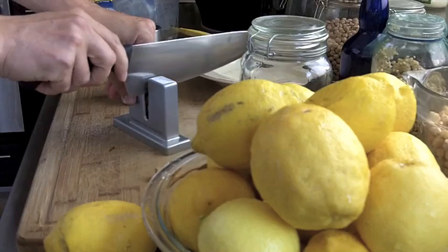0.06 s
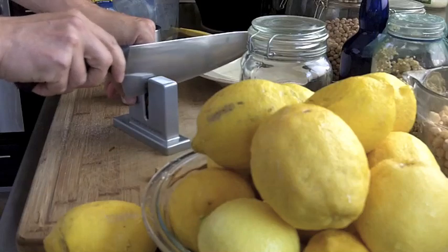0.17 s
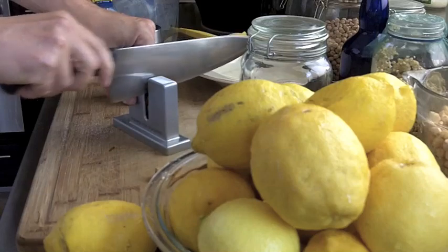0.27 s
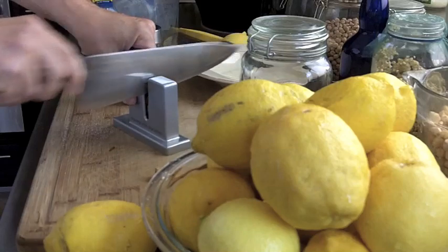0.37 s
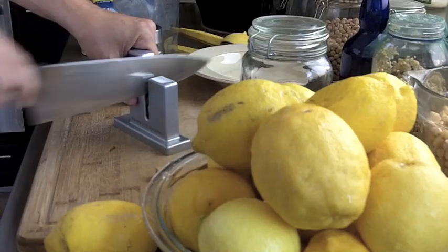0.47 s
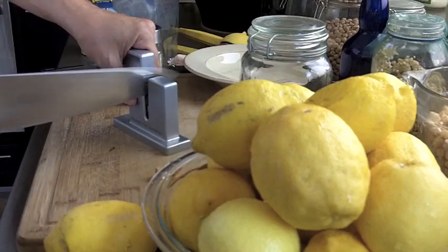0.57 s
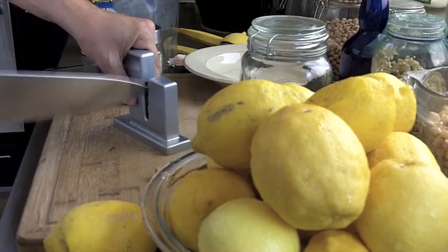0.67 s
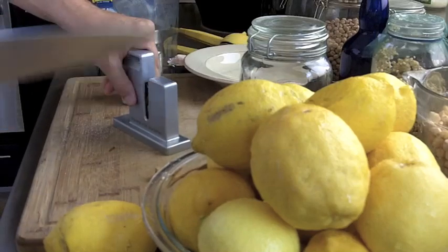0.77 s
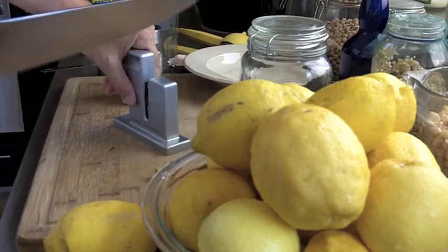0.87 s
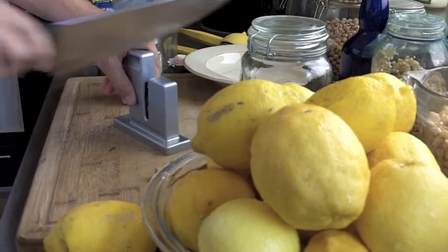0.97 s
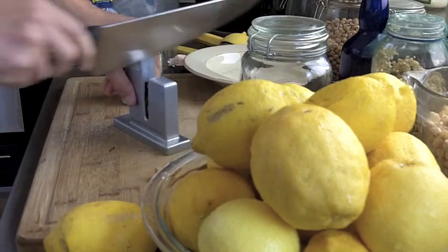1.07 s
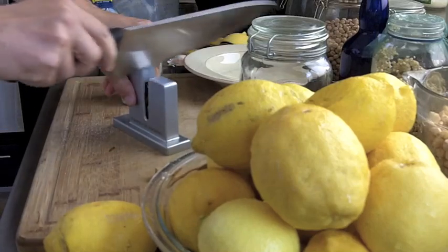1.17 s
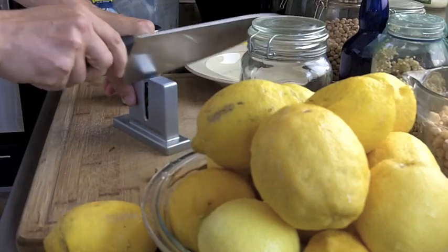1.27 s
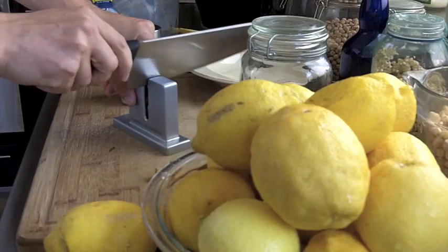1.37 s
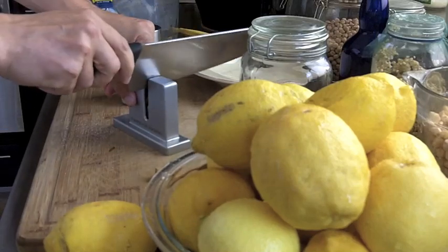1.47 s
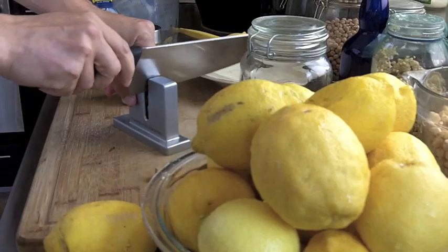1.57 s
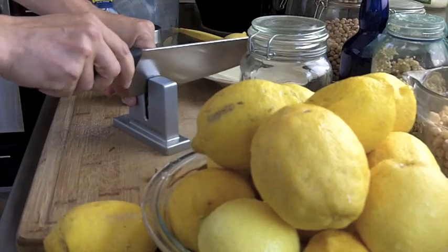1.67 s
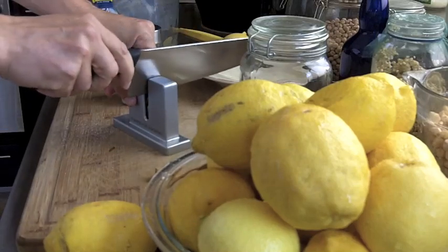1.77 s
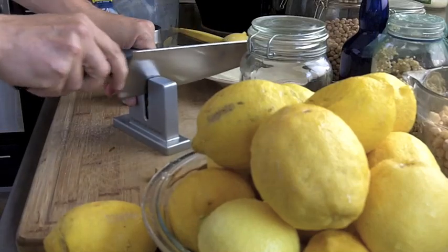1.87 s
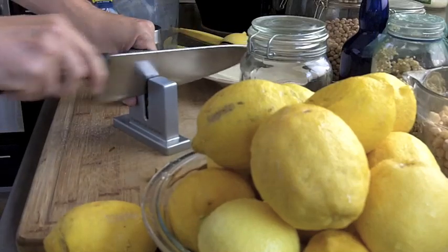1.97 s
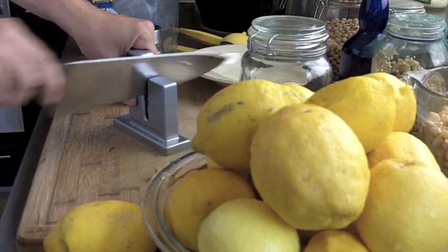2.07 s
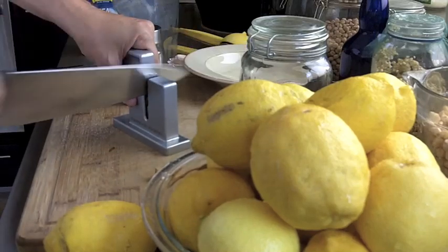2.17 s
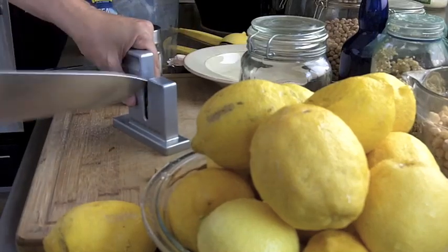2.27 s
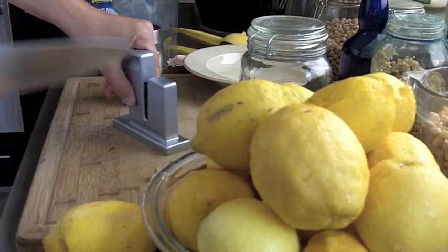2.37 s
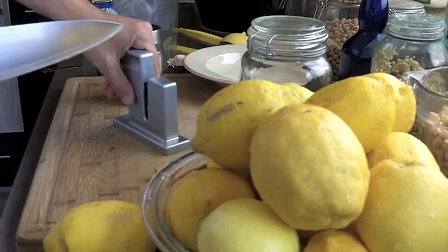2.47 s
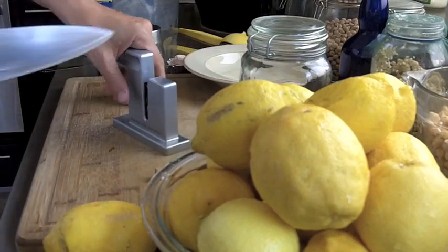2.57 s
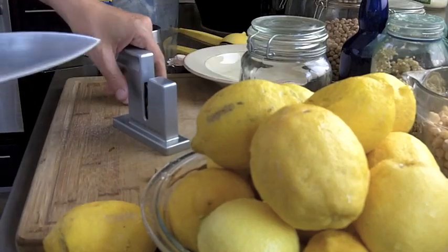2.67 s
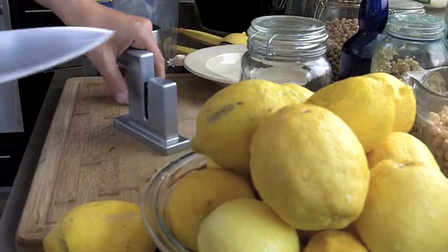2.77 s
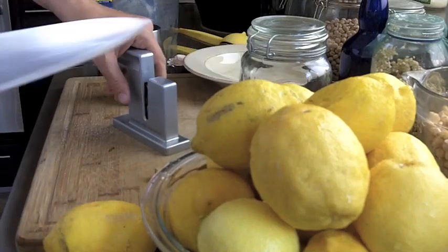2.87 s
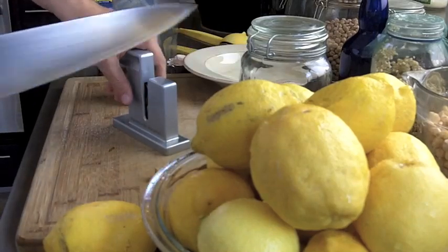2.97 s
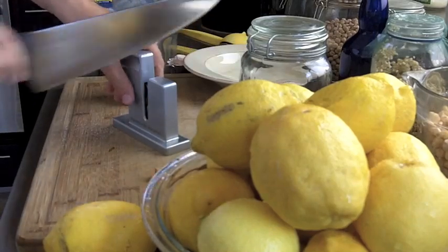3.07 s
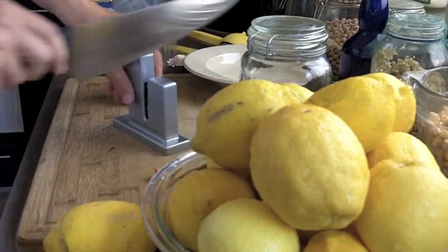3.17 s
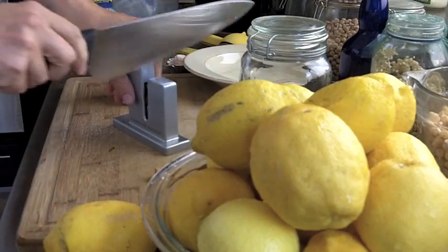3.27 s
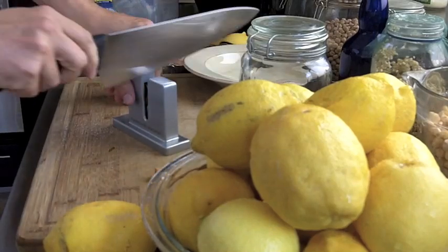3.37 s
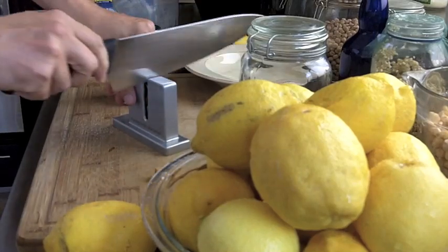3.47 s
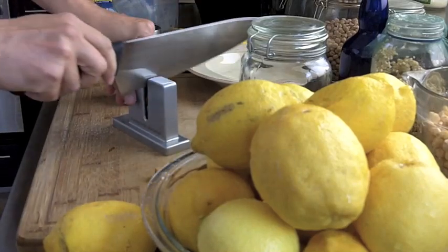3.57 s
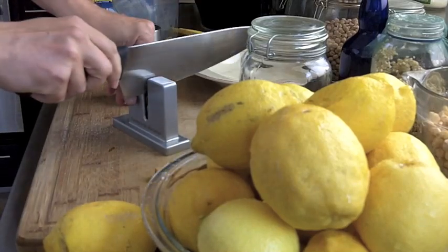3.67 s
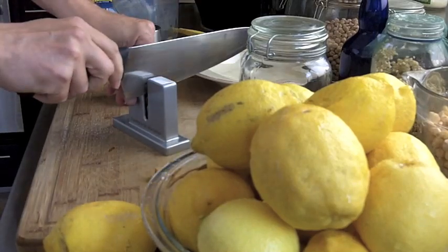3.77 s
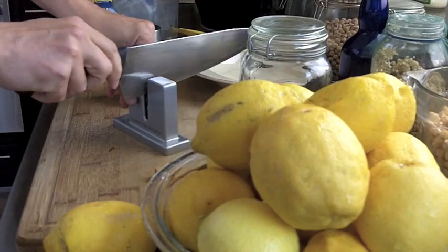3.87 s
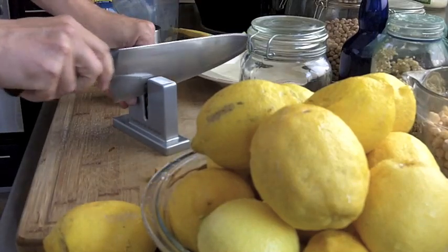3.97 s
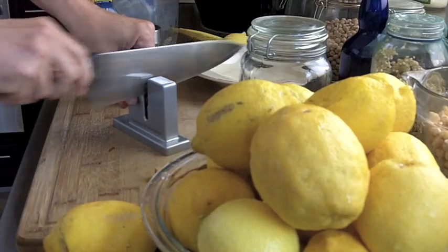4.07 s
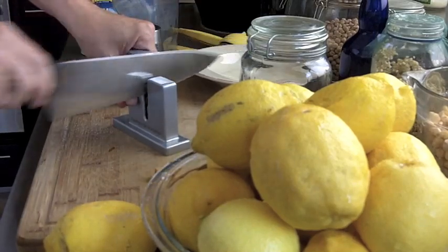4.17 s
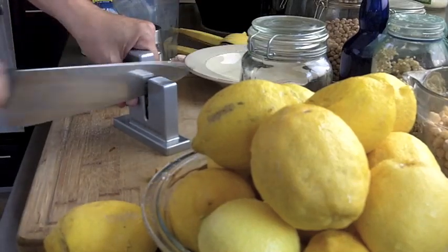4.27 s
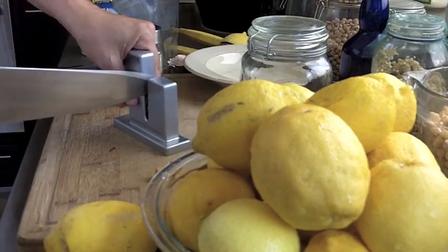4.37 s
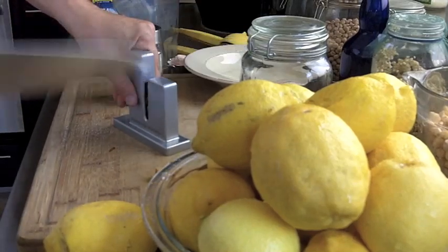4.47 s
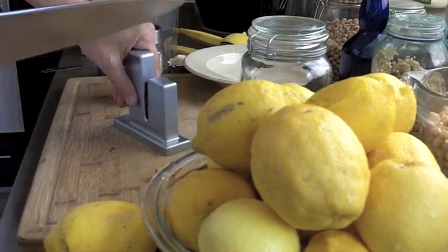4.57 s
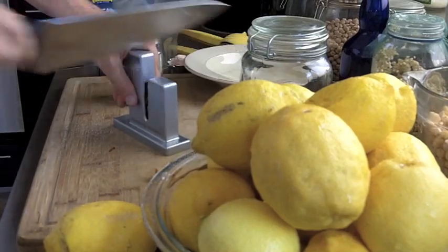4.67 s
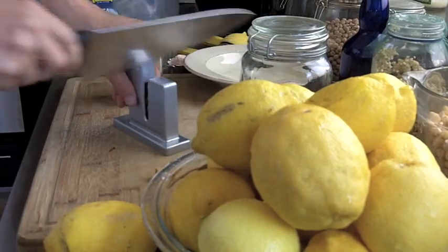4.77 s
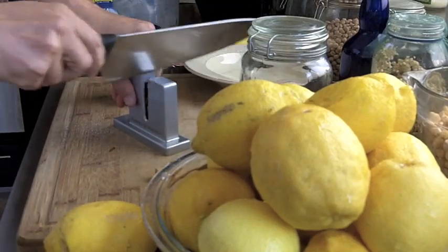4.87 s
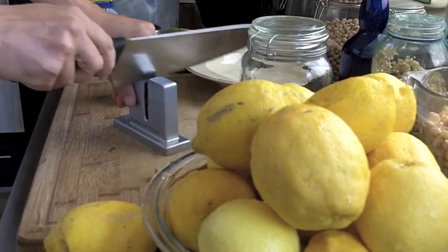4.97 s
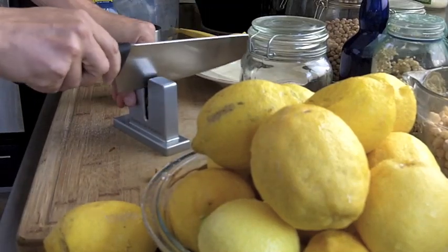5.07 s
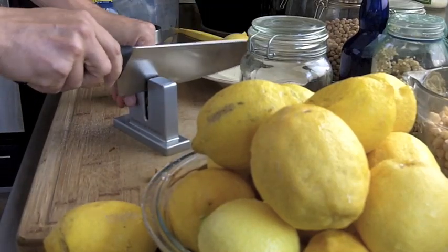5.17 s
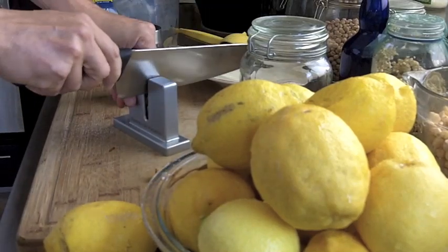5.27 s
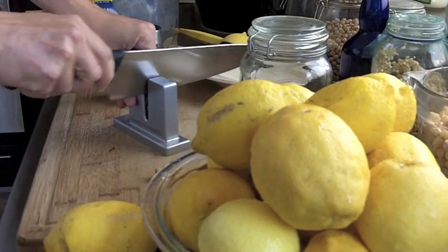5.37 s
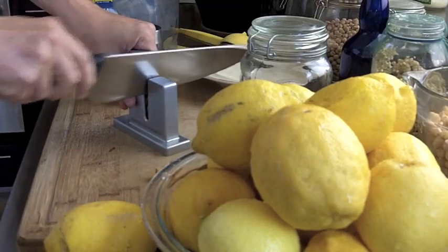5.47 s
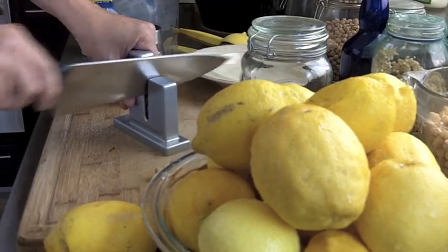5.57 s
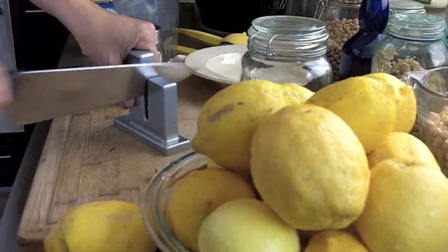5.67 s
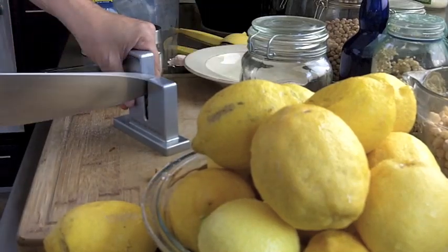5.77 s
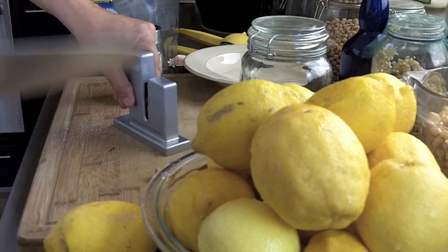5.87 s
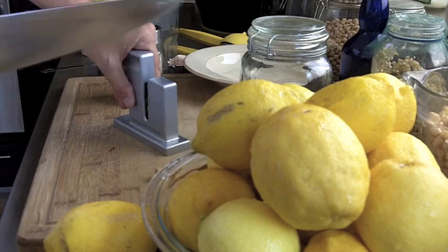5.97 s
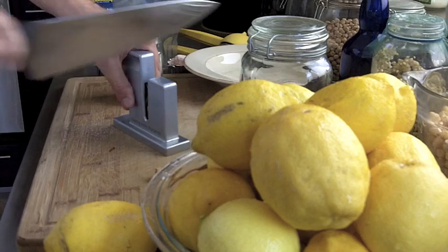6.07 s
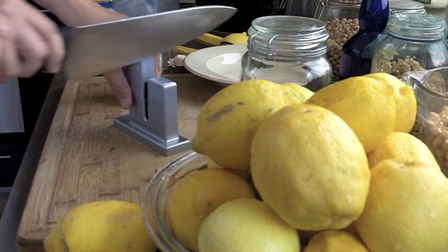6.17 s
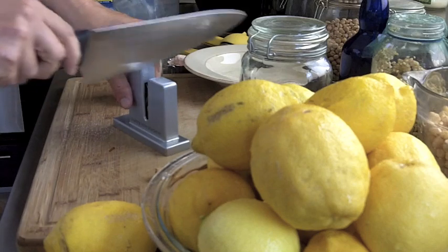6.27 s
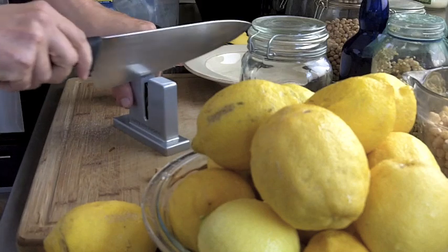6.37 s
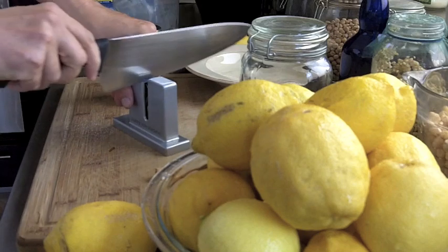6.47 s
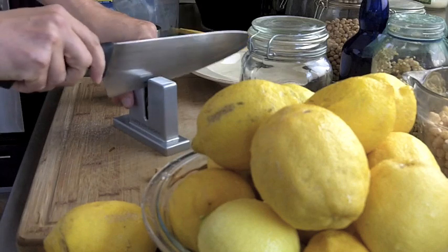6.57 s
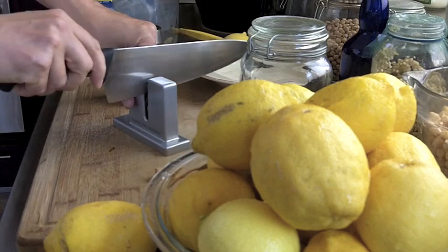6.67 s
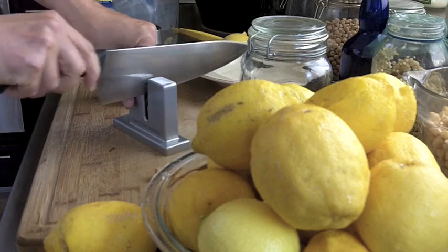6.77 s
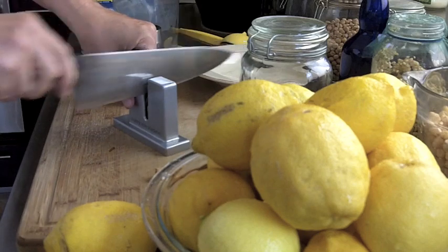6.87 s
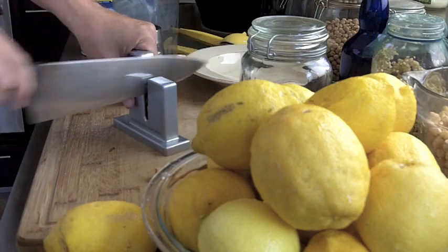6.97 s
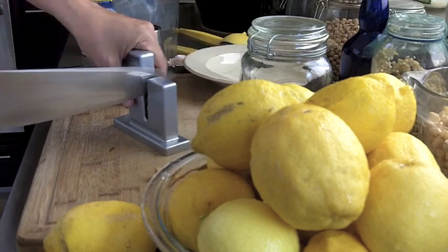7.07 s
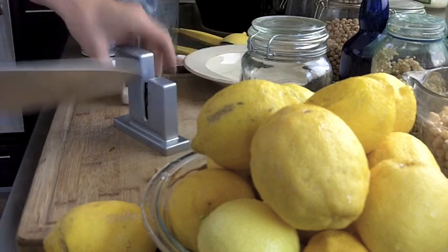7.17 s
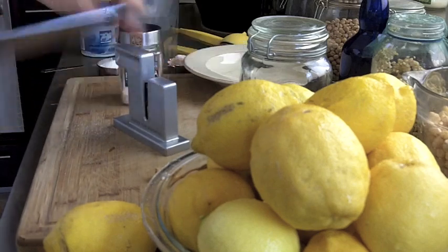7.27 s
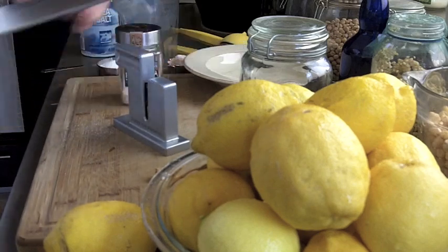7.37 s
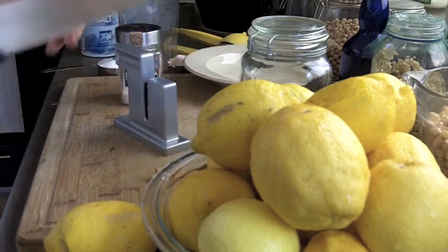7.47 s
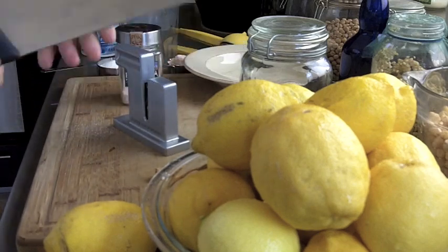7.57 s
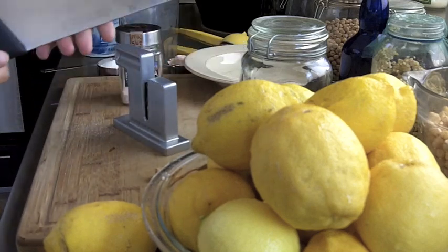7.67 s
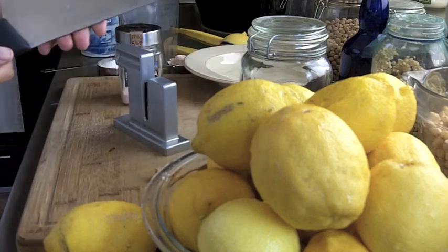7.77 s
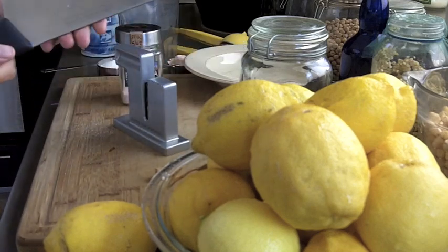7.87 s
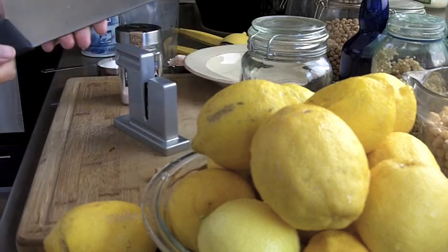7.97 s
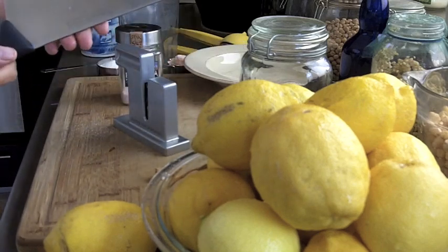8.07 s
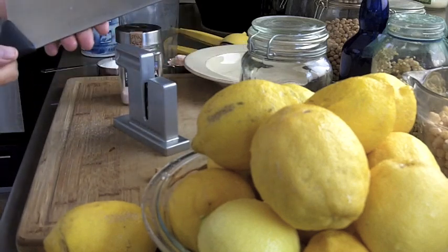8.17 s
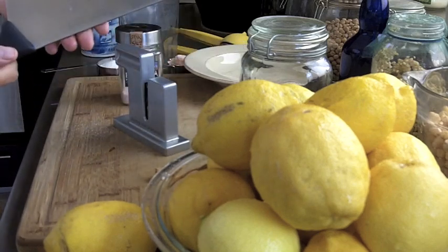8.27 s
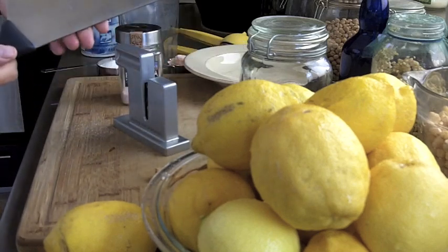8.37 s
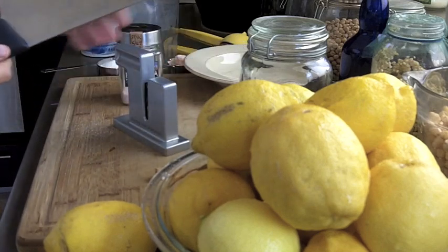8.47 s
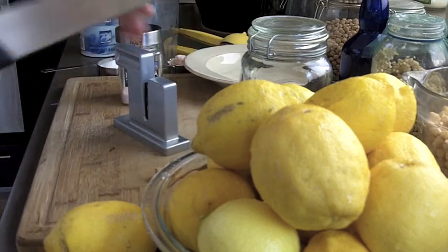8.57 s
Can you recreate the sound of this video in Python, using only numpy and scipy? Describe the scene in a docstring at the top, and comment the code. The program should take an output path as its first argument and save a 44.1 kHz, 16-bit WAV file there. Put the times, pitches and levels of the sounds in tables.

```python
"""In a small kitchen, a steel knife is drawn five times through a hand sharpener on a wooden board, dead centre.
The blade knocks at the slot, catches on rough spots and rasps with growing pressure until the tip squeaks out.
Stick-slip noise drives the resonances of holder and board, giving a hollow voice; the free blade rings faintly.
Early reflections and a diffuse tail place it in the room, over house rumble, hiss and appliance hum.
The microphone has a narrow treble dip and a little hiss of its own in each channel."""
import sys
import numpy as np
from scipy import signal
from scipy.fft import rfft, irfft, next_fast_len
from scipy.io import wavfile

SR = 44100
rng = np.random.default_rng(int(sys.argv[2]) if len(sys.argv) > 2 else 0)


def materialize(psi):
    """Save the field psi as 16-bit PCM at rate SR to the path in sys.argv[1].

    A 1-D psi becomes a single channel; in a 2-D psi each row is a channel.
    """
    bounded = np.clip(np.atleast_2d(psi).T, -1, 1)
    quanta = np.round(bounded * 32767).astype(np.int16)
    wavfile.write(sys.argv[1], SR, quanta)


N = 380141
TIME = np.arange(N) / SR   # s
SIZE = next_fast_len(N + SR)   # transform length, with room for a second of ringing
FREQ = np.maximum(np.arange(SIZE // 2 + 1) * SR / SIZE, 1)   # Hz

# House noise. Each row: frequency in Hz, relative density in dB per Hz.
HOUSE_NOISE = [(10, 7.5), (26, 0.5), (40, -8), (55, -9.5), (80, -15), (150, -19.5), (260, -22.5),
               (420, -19), (650, -18.5), (1000, -22.5), (1500, -27.5), (2500, -35.5), (5000, -44.5),
               (9000, -51.5), (15000, -53.5)]
HOUSE_NOISE_DB = -42.5
# Appliance hum. Each row: frequency in Hz, mean level in dB (rms).
APPLIANCE_HUM = [(59, -54), (102, -66), (163, -67), (637, -66), (997, -66), (4250, -79)]
# Kitchen decay. Each row: frequency in Hz, time to fall by 60 dB in s.
ROOM_DECAY = [(200, 0.89), (900, 0.89), (2000, 0.68), (5000, 0.88), (12000, 0.39)]
# Resonances of holder, board and clamped blade.
# Each row: frequency in Hz, width in Hz, height over the broad response in dB.
HOLDER_MODES = [(98, 20, 8), (320, 40, -2), (430, 30, 2), (490, 14, -2), (728, 14, 2), (846, 30, 3),
                (910, 20, 0), (1146, 20, -1), (1310, 45, -1), (1398, 45, 4), (1447, 18, 3), (1790, 20, 6),
                (2400, 70, -4), (3531, 60, -6), (4540, 90, -3), (6090, 80, -1), (6930, 60, -1),
                (7900, 110, -4), (9520, 130, -3), (10600, 60, 2)]
# Modes of the free blade. Each row: frequency in Hz, relative level in dB, time to fall by 60 dB in s.
FREE_BLADE_MODES = [(1790, 0, .7), (2336, -6, .2), (3531, 0, .6), (6013, 0, .28), (6640, -20, .34),
                    (7827, -16, .3), (9437, -2, .24)]
# The free blade is tapped or let go and sings.
# Each row: start in seconds, level in dB, frequency in Hz that the point of contact favours.
BLADE_PINGS = [(0.74, -42, 1790), (0.828, -41.5, 6013), (1.526, -48, 7000), (1.693, -56, 6013),
               (2.37, -35, 1790), (4.48, -44, 1790), (5.363, -46.5, 6013), (6.57, -28.5, 7200),
               (7.215, -42, 3531), (7.22, -42, 1790), (7.223, -36, 9437), (8.180, -67, 9437),
               (8.503, -54, 6013)]
# The blade knocks against the slot.
# Each row: start in seconds, strength in dB, treble relative to the middle in dB, bass likewise in dB.
SLOT_KNOCKS = [(0.195, -9.5, -3, -4.5), (0.236, -26, -13, 8), (0.308, -12, -24, -2.5),
               (0.397, -10.5, -2, -15), (0.828, -18.5, 14.5, 2.5), (1.528, -14.5, 1.5, 0.5),
               (1.69, -23.5, -18, 7), (1.764, -17.5, -9, -1.5), (1.869, -30, -10, 5),
               (1.956, -20, -15, 1.5), (3.856, -15, 5, 1.5), (4.04, -11.5, -24, -0.5),
               (5.348, -26.5, -10, 1.5), (5.363, -14, 2, 2.5), (5.421, -25.5, 6, 8), (5.525, -23, -5, 4),
               (6.569, -6.5, -16, -4), (6.761, -17.5, 3, 0.5), (6.81, -7.5, 5.5, -7),
               (6.887, 3, -19, -14.5), (8.186, -37, 5, -10), (8.503, -35, 5, -9)]
# Colours of knock, drag and bite. Each row: frequency in Hz, relative density in dB per Hz.
KNOCK_COLOUR = [(100, -19), (300, -3.5), (550, 2.5), (900, 7), (1400, 4.5), (1900, 0), (2600, 1),
                (4200, -6), (6500, -9.5), (9000, -17.5), (12000, -27.5), (15000, -30.5)]
DRAG_COLOUR = [(80, -29.5), (170, -23), (250, -23), (400, -13.5), (620, -6.5), (850, 1.5), (1050, 3.5),
               (1450, -5.5), (1700, -8.5), (2100, -10.5), (3000, -14.5), (5000, -38.5), (14000, -57.5)]
BITE_COLOUR = [(800, -8.5), (1800, 2.5), (2700, -1), (4000, -1.5), (5000, 1), (6500, 0), (8000, -6),
               (10000, -13.5), (12000, -17.5), (15000, -27)]
# Bending modes of the clamped blade. Each row: frequency in Hz, relative level in dB.
BENDING_MODES = [(2480, 1), (3000, -5.5), (3450, -5), (3950, 1.5), (4560, -3.5), (6200, 1.5), (7000, -4),
                 (7850, -13.5), (8800, -6), (9600, -8), (10600, -9.5)]
# Rough spots where the edge digs in. Each row: start in seconds, length in s, bite in dB, drag in dB.
ROUGH_SPOTS = [(0.352, 0.017, -41.5, -27), (0.426, 0.027, -54, -24.5), (0.455, 0.042, -23, -46),
               (0.497, 0.027, -27.5, -40), (0.555, 0.027, -33, -29), (0.696, 0.037, -42, -22.5),
               (1.962, 0.081, -49.5, -30), (2.166, 0.017, -27, -36), (4.099, .04, -46, -28),
               (4.181, 0.0096, -26.5, -34), (4.195, 0.076, -30.5, -35), (4.291, 0.031, -28.5, -25),
               (4.415, 0.034, -45, -23), (5.59, 0.017, -35, -38), (5.822, 0.015, -48, -26),
               (6.935, 0.068, -31.5, -26.5), (7.009, 0.014, -25, -29)]
# The pulls. Each row: start in seconds, time to the tip in s, press-in in s, let-go in s, drag in dB,
# bite in dB, squeak of the tip in dB, top slip rate in Hz, chatter relative to drag in dB.
KNIFE_PULLS = [(0.25, 0.48, 0.19, .07, -27.5, -38, -36, 1351, -4),
               (1.955, 0.4, .19, .025, -25, -37, -30.5, 1800, -1),
               (4.015, .46, 0.18, .04, -25.5, -35.5, -33, 1420, -1),
               (5.495, .388, 0.16, .03, -25.5, -38, -26.5, 1543, 1.5),
               (6.77, 0.44, 0.26, .025, -24, -35, -25.5, 2120, -4.5)]

ENTRY_DB, SWELL_DB = -13.5, 4   # pressure at first touch; its growth from heel to tip
TOUCH_S, BITE_LOW_HZ = 0.029, 490   # settling into the slot; shaving is too fine to shake the holder below this
SPEED_UP_AT, SPEED_UP_OVER = .45, .09   # where and how gradually the hand gathers speed, as shares of the edge
# slip rate and relative bite of a slow edge; chatter lost at full speed
SLOW_SLIP_HZ, SLOW_BITE_DB, CHATTER_FADE_DB = 826.3, -5.5, 7
TIP_S, TIP_DRAG_DB, TIP_BITE_DB = 0.017, -5.5, -3.5   # half-length of the squeak; drag and bite relative to it
NICK_RISE = .2   # share of a rough spot's length in which it builds up
CUTOFF_HZ = 15400   # top of the microphone channel


def from_db(db):
    """Decibels to gain."""
    return 10 ** (np.asarray(db) / 20)


def rms_one(x):
    """Scale to rms 1."""
    return x / np.sqrt(np.mean(x ** 2) + 1e-20)


def at_hz(points, hz):
    """Read a table on a log-frequency axis."""
    points = np.array(points)
    return np.interp(np.log(hz), np.log(points[:, 0]), points[:, 1])


def colour(x, spectrum):
    """Causal (minimum-phase) filter with the given spectrum and unit power gain."""
    gain = rms_one(from_db(at_hz(spectrum, FREQ)))
    cepstrum = irfft(np.log(gain), SIZE)
    # folding the cepstrum onto positive times makes the filter causal
    cepstrum[1:SIZE // 2] *= 2
    cepstrum[SIZE // 2 + 1:] = 0
    return irfft(rfft(x, SIZE) * np.exp(rfft(cepstrum)), SIZE)[:N]


def drift(rate):
    """Smooth random wander of rms 1 that changes about rate times a second."""
    pole = np.exp(-2 * np.pi * rate / SR)
    wander = signal.lfilter([1], [1, -2 * pole, pole * pole], rng.standard_normal(N + SR))
    return rms_one(wander[SR:])   # the first second only settles the filter


def split(x, hz):
    """The parts of x below and above hz, which sum to x."""
    low = signal.sosfilt(signal.butter(1, hz, fs=SR, output="sos"), x)
    return low, x - low


def narrow_noise(hz, width_hz):
    """An unsteady vibration around a frequency that may move."""
    phase = 2 * np.pi * np.cumsum(hz) / SR
    return drift(width_hz) * np.cos(phase) + drift(width_hz) * np.sin(phase)


def ambience(side_db):
    """Rumble and hiss of the house with an appliance hum, almost the same on both sides."""
    mid = colour(rng.standard_normal(N), HOUSE_NOISE)
    side = colour(rng.standard_normal(N), HOUSE_NOISE)
    hum = np.zeros(N)
    for hz, level_db in APPLIANCE_HUM:
        level = from_db(level_db + 0.86 * drift(1.1))
        hum += level * np.sqrt(2) * np.sin(2 * np.pi * hz * TIME + drift(0.94))
    opposed = from_db(side_db) * side * np.array([[1], [-1]])
    return hum + from_db(HOUSE_NOISE_DB) * (mid + opposed)


def kitchen(x, early_db, early_s, tail_db):
    """Quick reflections from the counter and jars, then a diffuse tail that dies by band."""
    age = TIME[:SR]
    early = rng.standard_normal(SR) * np.exp(-age / early_s) * (age > .0015)
    white, tail = rfft(rng.standard_normal(SR)), np.zeros(SR)
    bin_hz = np.arange(len(white)) + 1
    centres = np.geomspace(200, 12800, 7)   # octave bands, Hz
    for hz, share in zip(centres, np.eye(len(centres))):
        band = np.interp(np.log(bin_hz), np.log(centres), share)
        tail += irfft(white * band, SR) * from_db(-60 * age / at_hz(ROOM_DECAY, hz))
    tail *= np.clip(age / 0.005, 0, 1)
    early = from_db(early_db) * early / np.linalg.norm(early)
    tail = from_db(tail_db) * tail / np.linalg.norm(tail)
    return x + signal.fftconvolve(x, early + tail)[:N]


def body(force):
    """Holder, board and blade ring at their resonances on top of the broad response."""
    response = 1
    for hz, width, height_db in HOLDER_MODES:
        response = response + from_db(height_db) / (1 + 1j * (FREQ ** 2 - hz ** 2) / (FREQ * width))
    return irfft(rfft(force, SIZE) * response, SIZE)[:N]


def pings(focus_db):
    """Undamped by the slot, the blade rings in thin modes, weaker by focus_db per octave off the favoured one."""
    out, age = np.zeros(N), TIME[:SR * 3 // 4]
    for start, level_db, favoured_hz in BLADE_PINGS:
        at = round(start * SR)
        for hz, mode_db, t60 in FREE_BLADE_MODES:
            start_db = level_db + mode_db - focus_db * abs(np.log2(hz / favoured_hz))
            ring = from_db(start_db - 60 * age / t60) * np.sin(2 * np.pi * hz * age)
            out[at:at + len(age)] += ring[:N - at]
    return out


def knocks(rattle, rattle_s):
    """Each contact is a hard click followed by a short, decaying rattle in the slot."""
    force, age = np.zeros(N), TIME[:SR // 16]
    for start, strength_db, treble_db, bass_db in SLOT_KNOCKS:
        bounces = rng.standard_normal(len(age)) * np.exp(-age / rattle_s)
        hit = rattle * bounces / np.linalg.norm(bounces)
        hit[0] += 1   # the click
        low, rest = split(hit, 2600)
        middle, high = split(rest, 4800)
        hit = from_db(bass_db) * low + middle + from_db(treble_db) * high
        at = round(start * SR)
        force[at:at + len(age)] += (from_db(strength_db) * hit)[:N - at]
    return colour(force, KNOCK_COLOUR)


def nicks():
    """Extra drag and bite as gains: a rough spot grabs quickly and frees the edge gradually."""
    drag, bite = np.zeros((2, N))
    peak_at = np.clip(NICK_RISE, .01, .9)
    for start, length, bite_db, drag_db in ROUGH_SPOTS:
        grab = np.sqrt(np.interp((TIME - start) / length, [0, peak_at, 1], [0, 1, 0]))
        drag += grab * from_db(drag_db)
        bite += grab * from_db(bite_db)
    return drag, bite


def pull_controls():
    """Each pull presses in, gathers speed and lets go at the tip: four gains, travel 0-1 and slip rate in Hz."""
    drag, bite, sing, chatter, travel, slip_hz = np.zeros((6, N))
    for start, length, press_s, let_go_s, drag_db, bite_db, tip_db, top_hz, chatter_db in KNIFE_PULLS:
        age = TIME - start
        along = np.clip(age / length, 0, 1)   # heel 0, tip 1
        pressed = np.clip(age / press_s, 0, 1)
        settling = np.clip(age / TOUCH_S + .5, 0, 1) ** 2
        letting_go = np.exp(-np.clip((age - length) / let_go_s, 0, 10) ** 2)
        touching = settling * letting_go
        pressure = touching * from_db(ENTRY_DB * (1 - pressed) + SWELL_DB * (along - 1))
        speed = 1 / (1 + np.exp((SPEED_UP_AT - along) / SPEED_UP_OVER))
        tip = from_db(tip_db) * np.exp(-np.minimum(abs(age - length) / TIP_S, 10) ** 2)
        shaving = pressure * from_db(bite_db + SLOW_BITE_DB * (1 - speed))
        drag += pressure * from_db(drag_db) + tip * from_db(TIP_DRAG_DB)
        bite += shaving + tip * from_db(TIP_BITE_DB)
        sing += shaving + tip
        chatter += pressure * pressed * from_db(drag_db + chatter_db - CHATTER_FADE_DB * speed)
        in_slot = touching > 1e-4
        travel += in_slot * along
        slip_hz += in_slot * speed * (top_hz - SLOW_SLIP_HZ)
    return drag, bite, sing, chatter, travel, SLOW_SLIP_HZ + slip_hz


def slips(per_s, spread_db, smooth):
    """Tiny stick-slip releases of uneven size over a smooth rub; rms 1."""
    sizes = from_db(spread_db * np.minimum(rng.exponential(1, N), 4)) * rng.choice([-1, 1], N)
    releases = rms_one(sizes * (rng.random(N) < per_s / SR))
    return rms_one(releases + smooth * rng.standard_normal(N))


def squeal(travel, width_hz, swing, flare_db):
    """Friction feeds the bending modes; each swings in pitch as the clamp passes its nodes, and flares briefly."""
    out = np.zeros(N)
    for hz, level_db in BENDING_MODES:
        nodes = np.sqrt(hz / 1000)   # bending waves shorten with the root of frequency
        bend = swing * (np.sin(2 * np.pi * nodes * travel + drift(0.94)) + .5 * drift(12))
        flare = from_db(level_db + flare_db * np.tanh(drift(23) - .6))
        out += flare * narrow_noise(hz * (1 + bend), width_hz)
    return rms_one(out)


def rasp(squeal_db, judder_db, grit_db, brighten_db):
    """Coarse slips shake the holder, fine ones shave the steel, the blade squeals; all follow the hand's judder.

    Chatter at the slip rate is added without the judder."""
    drag, bite, sing, chatter, travel, slip_hz = pull_controls()
    nick_drag, nick_bite = nicks()
    drag, bite, sing = np.hypot(drag, nick_drag), np.hypot(bite, nick_bite), np.hypot(sing, nick_bite)
    judder = from_db(judder_db * drift(45))
    grit = rms_one(from_db(grit_db * np.tanh(drift(69))))   # burrs on the edge bunch the fine slips

    rubbing = judder * drag * slips(per_s=1800, spread_db=0.5, smooth=0.52)
    low, high = split(rubbing, 1300)
    tilt = from_db(brighten_db * (travel - .5))   # slips sharpen from heel to tip
    coarse = colour(low / tilt + high * tilt, DRAG_COLOUR)

    shaving = judder * grit * bite * slips(per_s=2200, spread_db=1.0, smooth=0.19)
    fine = colour(shaving, BITE_COLOUR)
    fine = signal.sosfilt(signal.butter(2, BITE_LOW_HZ, "high", fs=SR, output="sos"), fine)

    singing = judder * sing * squeal(travel, width_hz=74, swing=.04, flare_db=11.5)
    chattering = chatter * narrow_noise(slip_hz, width_hz=91)
    return coarse + fine + from_db(squeal_db) * singing + chattering


def scene():
    """The sharpener stands straight ahead in the kitchen, with the house noise around it."""
    force = rasp(squeal_db=-2.0, judder_db=2.0, grit_db=4.5, brighten_db=3.0)
    force = force + knocks(rattle=2.37, rattle_s=0.012)
    sharpening = body(force) + pings(focus_db=32.0)
    in_room = kitchen(sharpening, early_db=-11.0, early_s=0.02, tail_db=-10.5)
    return in_room + ambience(side_db=-24.5)


def record(dry):
    """The microphone has a narrow dip in the treble, each channel adds a faint hiss, and the top is cut."""
    dipped = signal.lfilter(*signal.iirnotch(5480, 7.0, fs=SR), dry)
    hissing = dipped + from_db(-80) * rng.standard_normal((2, N))
    return signal.sosfilt(signal.ellip(12, .1, 80, CUTOFF_HZ, fs=SR, output="sos"), hissing)


dry = scene()
out = record(dry)
materialize(out)
```